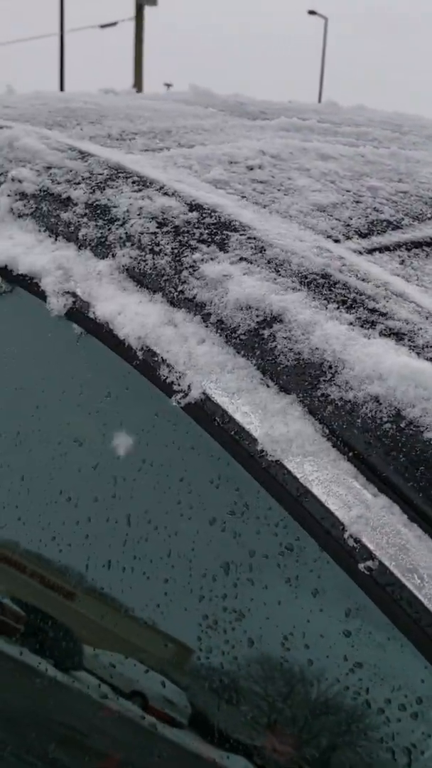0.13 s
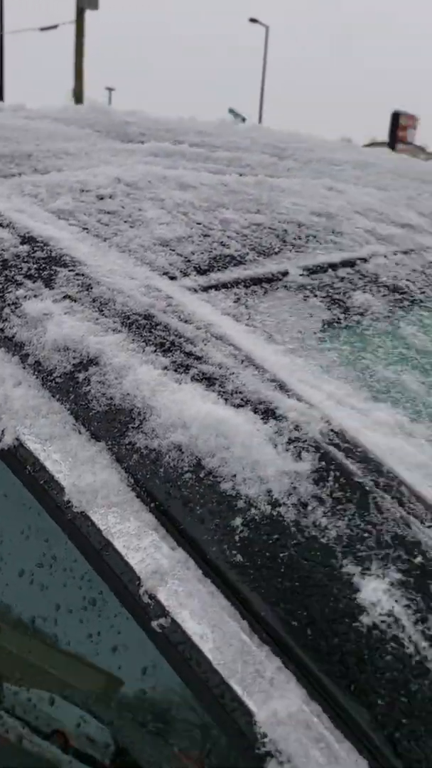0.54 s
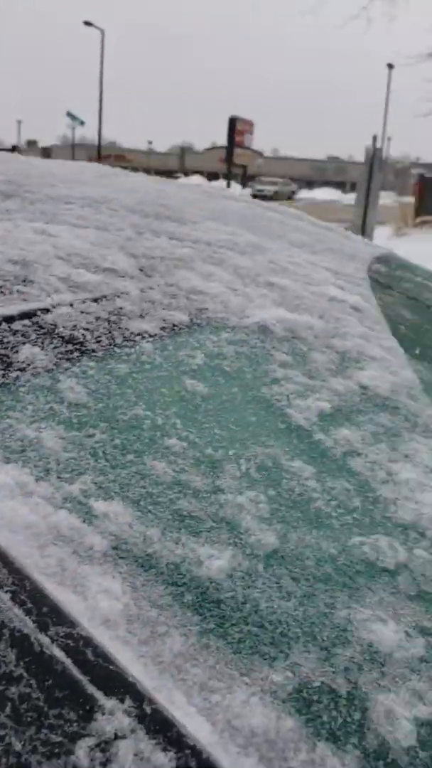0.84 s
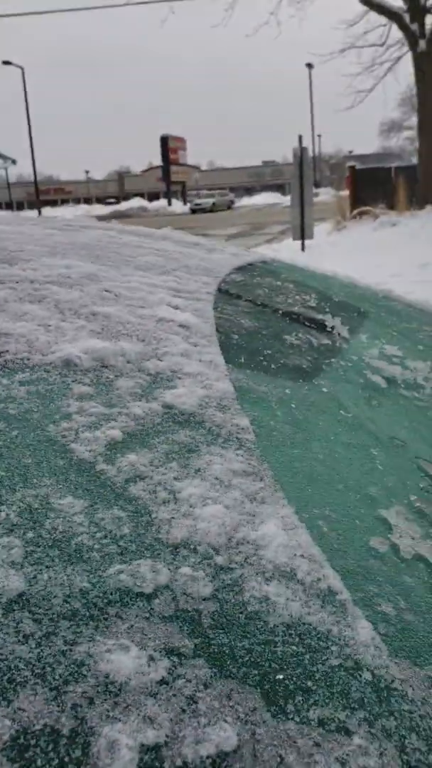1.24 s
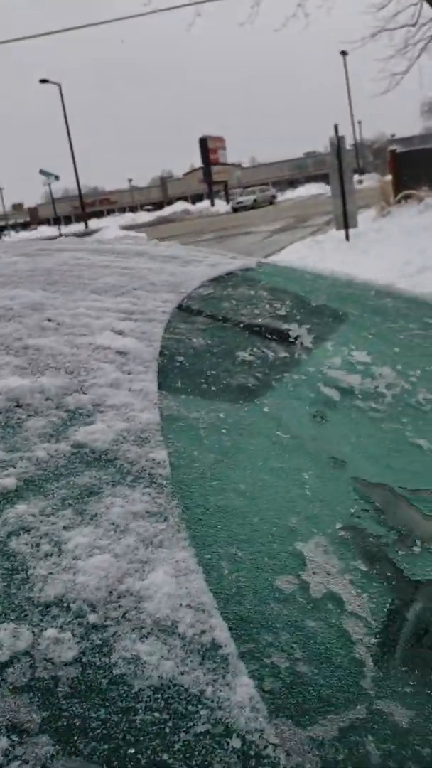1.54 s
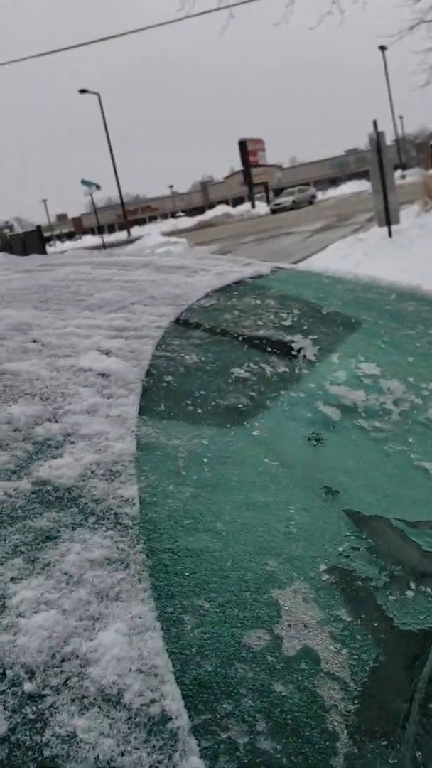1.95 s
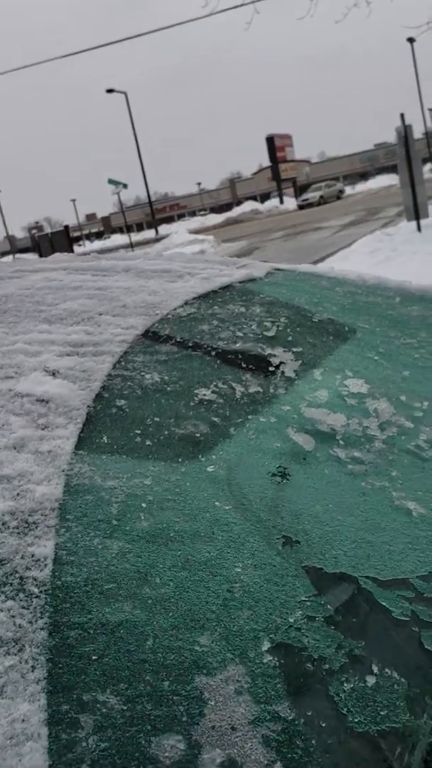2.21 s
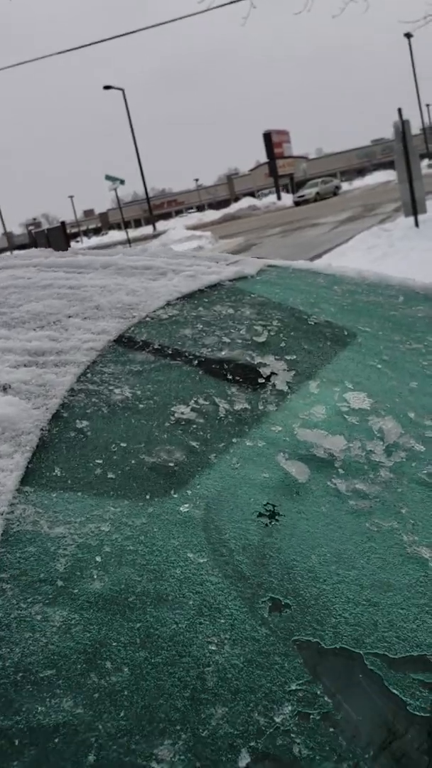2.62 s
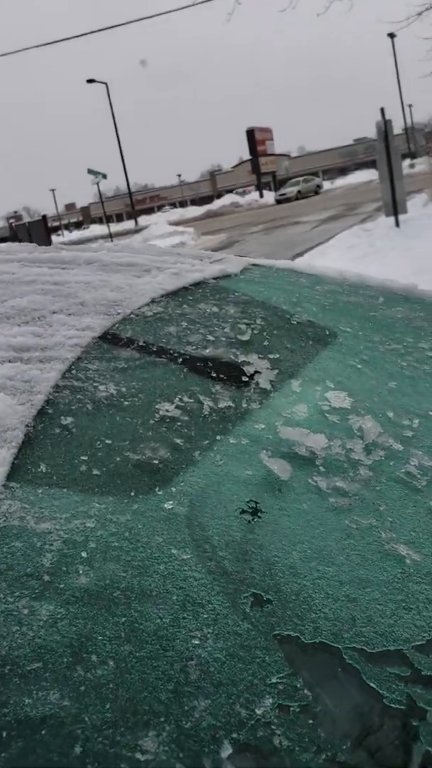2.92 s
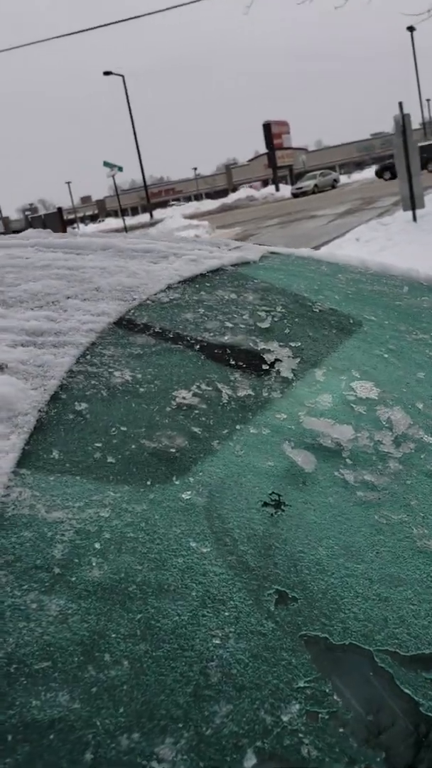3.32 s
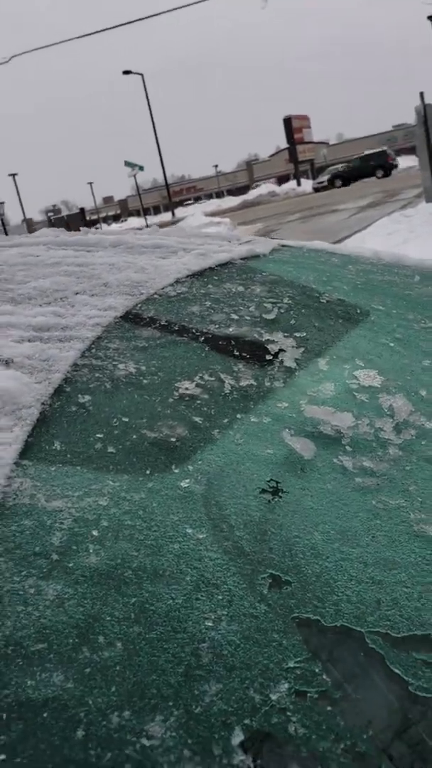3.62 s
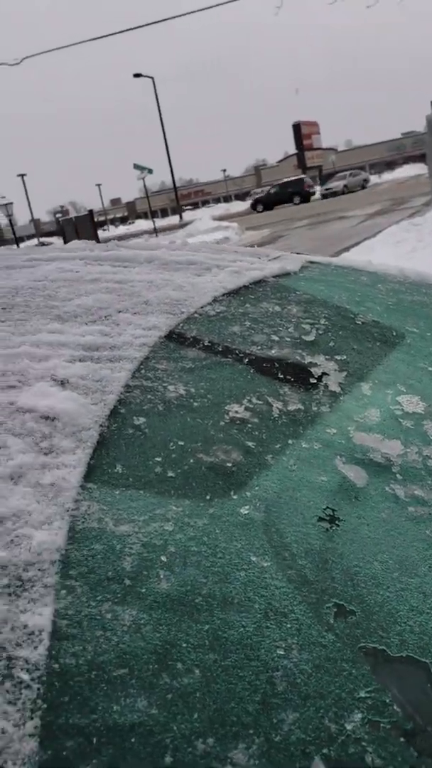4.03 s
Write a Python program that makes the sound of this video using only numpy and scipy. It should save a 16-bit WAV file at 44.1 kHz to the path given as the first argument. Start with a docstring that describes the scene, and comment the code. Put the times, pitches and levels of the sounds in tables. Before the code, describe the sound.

Close, harsh ice scraping on car glass: quick juddering bursts, then a fumbling lull of light clicks, and one last strong stroke.

```python
"""A plastic scraper is pushed over the iced rear window of a car in short rough strokes, close to a phone.
The edge breaks ice in juddering bursts of tiny random cracks that ring the blade and the crushed ice.
Flakes ring at many pitches, and the same slips shake the decaying modes of the pane.
Lone knocks and chips, shaped noise through the blade modes, fall among the strokes; one soft low bump joins.
Under it lies a quiet winter street of slowly swelling noise bands."""
import sys
import numpy as np
from scipy import signal
from scipy.fft import rfft, irfft
from scipy.io import wavfile
from scipy.ndimage import uniform_filter1d

SR = 44100
rng = np.random.default_rng(int(sys.argv[2]) if len(sys.argv) > 2 else 0)


def store_wav(level_fs):
    """Save 16-bit WAV to argv[1]."""
    pcm = np.round(np.clip(np.atleast_2d(level_fs), -1, 1) * 32767)
    wavfile.write(sys.argv[1], SR, pcm.T.astype(np.int16))


N = 183432

# blade resonances: (centre [Hz], width of each of two passes [Hz], relative level [dB])
BLADE_MODES = [(705, 530, -5.5), (980, 580, -9), (1213, 525, -6), (1600, 350, -9.5), (1850, 840, -5),
               (2666, 510, -4.5), (3100, 720, -1.5), (4060, 500, -6.5), (5140, 1130, -4),
               (6050, 2100, -13.5)]


def undb(db):
    """Decibels to amplitude factor."""
    return 10 ** (np.asarray(db) / 20)


def unit(x):
    """Scale to an RMS of 1."""
    return x / np.sqrt(np.mean(x ** 2))


def band(x, hz, width):
    """Resonant band-pass, gain 1 at the centre."""
    return signal.lfilter(*signal.iirpeak(hz, hz / width, fs=SR), x)


def steep_band(x, hz, width):
    """Two equal resonances in series give steeper skirts; RMS 1."""
    return unit(band(band(x, hz, width), hz, width))


def ring(x, hz, t60):
    """One decaying mode; a unit blow rings with size 1."""
    pole = np.exp((2j * np.pi * hz - np.log(1000) / t60) / SR)
    return signal.lfilter([1], [1, -pole], x).imag


def walk(rate):
    """Random levels held 1 / rate s and slewed; spread near 1."""
    hold = int(SR / rate)
    levels = np.repeat(rng.standard_normal(N // hold + 1), hold)
    return 1.2 * uniform_filter1d(levels, hold)[:N]


def pair(like):
    """Weights that turn two unrelated signals into left and right of likeness `like`."""
    like = np.clip(like, 0, 1)
    a, b = np.sqrt(1 + like), np.sqrt(1 - like)
    return np.array([[a, b], [a, -b]]) / np.sqrt(2)


def contact(times, dbs, rise_db_s, fall_db_s):
    """Power of one contact: straight in dB between its moments, steady slopes before and after."""
    t = np.arange(N) / SR
    before = np.maximum(times[0] - t, 0)
    after = np.maximum(t - times[-1], 0)
    db = np.interp(t, times, dbs) - rise_db_s * before - fall_db_s * after
    return undb(2 * db)


def gesture():
    """Blade level and five tone colours; contact powers add, and the strongest sets the colour."""
    # Colours are relative levels before the mix trims:
    # lower blade modes, upper blade modes, fine crush, lower pane modes, upper pane modes.
    # firm strokes that land, rise or sag through a middle level, and lift:
    # (landing [s], level [dB], middle [s], level [dB], lift [s], level [dB], then the five colours [dB])
    strokes = [(0.174, -20.5, 0.24, -23.5, 0.27, -29.5, -6.5, 0, -6, -3, -8),
               (0.565, -23.5, 0.612, -21, 0.6805, -31, -3.5, 3.5, -3, -6, -9),
               (1.227, -39, 1.324, -23, 1.358, -22.5, -1.5, 4.5, -3.5, -4.5, -7),
               (1.365, -28, 1.425, -29.5, 1.478, -35, 2.5, -1, -3, -1, -2.5),
               (1.544, -31.5, 1.595, -22.5, 1.69, -30.5, 4, 1.5, -4, -11, -13),
               (1.864, -33, 1.91, -23, 2.04, -22.5, 1, 0.5, -5, -9, 1),
               (2.05, -23, 2.11, -20.5, 2.14, -27, -3.5, 1.5, -3, -5.5, -5.5),
               (2.288, -41.5, 2.327, -23, 2.507, -28, 0.5, 0.5, -1.5, -11.5, -11),
               (2.62, -28.5, 2.64, -29.5, 2.66, -42, 4, 1.5, -4, 8.5, -4.5),
               (3.989, -25, 3.99, -22.5, 4.167, -19.5, -1, 0, -7, -6, -2.5)]
    # light scuffs, the edge set down or dragged back:
    # (from [s], to [s], level [dB], then the first three colours [dB])
    scuffs = [(0, 0.022, -44.5, 8.5, -3.5, -17), (0.158, .16, -50, 8, -12, -18),
              (0.33, 0.361, -42, 0, 0.5, -6), (0.549, 0.56, -34.5, -1.5, 3.5, -6),
              (0.708, 0.726, -35, -2, -1.5, -3.5), (0.845, 0.942, -48, 0, -0.5, 1.5),
              (1.102, 1.14, -58.5, 0, 0, 5), (1.176, 1.2, -50.5, 4, 3.5, -3), (1.519, 1.545, -42, 4, 1, -3),
              (1.677, 1.694, -38, -7, -20, -19), (1.755, 1.796, -46.5, -2, -9, -10),
              (2.138, 2.178, -34.5, -8, 1, -4), (2.68, 2.717, -47, 6.5, 0, -1),
              (2.839, 2.855, -42, 10, 3, -3.5), (2.921, 2.963, -40, 3, 5, -2),
              (3.067, 3.113, -40.5, 1.5, -2, -5.5), (3.13, 3.173, -43.5, 1.5, -2.5, -3),
              (3.216, 3.272, -33.5, -4, 7.5, -0.5), (3.314, 3.352, -37.5, -7, -10, 0),
              (3.362, 3.385, -37, 10, 4, -3), (3.428, 3.426, -34.5, -3, -2, -4.5),
              (3.475, 3.567, -44.5, 0.5, -6, -2), (3.6, 3.608, -44, -1, -5, -3.5),
              (3.648, 3.724, -55.5, 9.5, -2.5, 6), (3.761, 3.846, -41, 2.5, 4, 2),
              (3.902, 3.904, -43, 10, 3, 2.5), (3.967, 3.983, -41, 8, 2, -4)]
    # the edge lying on the ice: (level [dB], then the five colours [dB])
    rest = (-63.5, 6, -3, -3.5, 10.5, 3)
    land_db_s, lift_db_s = 1390, 1016
    skitter_db, skitter_fall_db_s = -22.5, 160.  # loose ice slides on after each lift, re the lift level
    scuff_rise_db_s, scuff_fall_db_s = 413, 373
    scuff_pane_db = [-3.5, -3]  # lower and upper pane colours of every scuff

    touches = []
    for land, land_db, middle, middle_db, lift, lift_db, *tint in strokes:
        stroke = contact([land, middle, lift], [land_db, middle_db, lift_db], land_db_s, lift_db_s)
        skitter = contact([lift], [lift_db + skitter_db], land_db_s, skitter_fall_db_s)
        touches.append((stroke + skitter, tint))
    for start, end, db, *tint in scuffs:
        scuff = contact([start, end], [db, db], scuff_rise_db_s, scuff_fall_db_s)
        touches.append((scuff, tint + scuff_pane_db))

    power = undb(2 * rest[0]) * np.ones(N)
    colour = np.array(rest[1:])[:, None] * undb(2 * rest[0])
    for touch, tint in touches:
        power = power + touch
        colour = colour + touch * np.array(tint)[:, None]
    return 10 * np.log10(power), colour / power


def leaning(follow_db):
    """Push on the lower pane modes: what follows the blade plus the leans of the hand."""
    # the hand leans on the glass and the lower modes swell: (time [s], level before the pane trim [dB])
    hand_leans = [(.06, -43.5), (.185, -27), (.25, -26), (.575, -27), (0.679, -24.5), (.86, -38),
                  (1.16, -38), (1.35, -20), (1.43, -24.5), (1.6, -33.5), (1.68, -31.5), (1.94, -14),
                  (2.13, -24.5), (2.43, -28), (2.53, -33.5), (2.638, -28), (2.76, -35), (2.94, -30.5),
                  (3.18, -36.5), (3.27, -54), (3.345, -34.5), (3.375, -29.5), (3.49, -30.5), (3.612, -31),
                  (3.77, -41), (3.85, -30), (4.0, -32.5), (4.065, -22)]
    leans = sum(contact([s], [db], rise_db_s=286, fall_db_s=255) for s, db in hand_leans)
    return 10 * np.log10(undb(2 * follow_db) + leans)


def judder(firm, per_s, spread_db, rise_s, tail_s):
    """The edge sticks and lets go unevenly; the firmer the contact, the more steady rubbing fills the gaps."""
    slips = (rng.random(N) < per_s / SR) * undb(spread_db * rng.standard_normal(N))
    onsets = uniform_filter1d(slips, int(rise_s * SR))
    bursts = signal.lfilter([1], [1, -np.exp(-1 / (tail_s * SR))], onsets)
    return slips, (firm + unit(bursts)) / (firm + 1)


def grit(per_s, spread_db):
    """Two trains of tiny cracks of random sign, a few larger than the rest."""
    hit = rng.random((2, N)) < per_s / SR
    signed = hit * rng.standard_normal((2, N))
    return unit(signed * undb(spread_db * rng.exponential(size=(2, N))))


def body(force, modes, patchy_db, like, tilt_db=lambda hz: 0):
    """Steep resonances whose strength wanders as the grip and the ice change."""
    out = 0
    for k, (hz, width, db) in enumerate(modes):
        rung = steep_band(force, hz, width)
        level_db = db + patchy_db * walk(40) + tilt_db(hz)
        out = out + (-1) ** k * undb(level_db) * rung  # neighbours have opposite signs
    return pair(like) @ out


def chips(per_s, t60, low_hz, high_hz, count):
    """Flakes of ice of many sizes break free, each ringing briefly at its own pitch and place."""
    out = 0
    for hz in np.geomspace(low_hz, high_hz, count):
        blows = (rng.random(N) < per_s / count / SR) * undb(2.5 * rng.standard_normal(N))
        placed = blows * (pair(0.49) @ rng.standard_normal((2, N)))
        out = out + ring(placed, hz, t60)
    return unit(out)


def pane(force, upper_db, upper_hz=220.):
    """The low modes of the glass and its frame; below the first mode the pane hardly radiates."""
    # (pitch [Hz], relative drive [dB], time to fall by 60 dB [s])
    glass_modes = [(111.7, -7.5, 0.079), (123.4, -1, 0.17), (156.9, -3, 0.12), (194, -2, 0.056),
                   (258.7, -3.5, 0.059), (306, -4, 0.073), (402, -0.5, 0.024), (520, -17, 0.033)]
    rung = 0
    for hz, db, t60 in glass_modes:
        rung = rung + ring(force * undb(db + upper_db * (hz > upper_hz)), hz, t60)
    return signal.sosfilt(signal.butter(8, 90., "high", fs=SR, output="sos"), rung)


def scraping():
    """Grit in bursts through blade and crushed ice, ringing flakes on top; the same slips push the pane."""
    # crushed-ice bands: (centre [Hz], width of each of two passes [Hz], relative level [dB])
    crush_bands = [(7890, 4000, -1), (9960, 1900, -7), (11880, 2700, 1.5), (13100, 2700, -5),
                   (14300, 3600, 0.5)]
    blade_db, (lower_db, bright_db, crush_db, low_pane_db, upper_pane_db) = gesture()
    push_db = leaning(blade_db + low_pane_db)
    upper_db = blade_db + upper_pane_db - push_db  # upper pane modes do not follow the leans
    firm = np.interp(blade_db, [-45, -25], [.3, 1.3])
    slips, bursts = judder(firm, per_s=120., spread_db=1.5, rise_s=0.00071, tail_s=0.0074)

    def blade_tilt(hz):
        return lower_db * (hz < 1800) + bright_db * (hz > 3600)

    blade = body(bursts * grit(9000., 1.5), BLADE_MODES, patchy_db=3.28, like=0.66, tilt_db=blade_tilt)
    crush = body(bursts * grit(13000., 1.6), crush_bands, patchy_db=2., like=0.15)
    flakes = chips(per_s=700., t60=0.025, low_hz=1400.0, high_hz=5625.0, count=30)
    edge = undb(-5.5) * blade + undb(-5.0) * flakes + undb(crush_db - 2.0) * crush

    # the pane is pushed by the stroke and rings on after it
    push = 0.57 * unit(slips) * rng.standard_normal(N) + rng.standard_normal((2, N))
    glass = pair(0.96) @ pane(push * undb(push_db - 31.5), upper_db + 4.0)
    return undb(blade_db) * edge + glass


def street():
    """Distant traffic and air: half-octave bands that swell together and flicker alone."""
    # spectrum before the overall level is set: (frequency [Hz], relative level per Hz [dB])
    spectrum = [(18, -9), (45, 2.5), (80, -31), (150, 0.5), (450, -14), (1000, -8), (1600, -28),
                (2300, -21), (7500, -43), (12500, -21.5), (16000, -26)]
    curve_hz, curve_db = np.array(spectrum).T
    out, swell = 0, walk(1.0)
    for hz in 32 * 2 ** np.arange(0, 9.1, .5):
        # 10 log10(hz) because the bands widen with pitch
        db = np.interp(np.log(hz), np.log(curve_hz), curve_db) + 10 * np.log10(hz)
        noise = steep_band(rng.standard_normal((2, N)), hz, hz / 2)
        level_db = db + 1.7 * swell + 4.3 * walk(6.96)
        likeness = 1 / (1 + hz / 500.0)  # the low bands are almost mono
        out = out + undb(level_db) * (pair(likeness) @ noise)
    return unit(out) * undb(-49)


def cracks(rise_s=0.00078, tail_s=0.0029, push_s=0.0015, thud_db=-26.5, spread=0.31):
    """Each crack rings the blade modes near its own pitch, sprays fine crush and thuds softly in the pane."""
    # lone cracks and knocks: (time [s], level before the common trim [dB], centre [Hz],
    # fine crush re the knock [dB])
    crack_events = [(0.0425, -8.5, 2260, -42), (0.1264, -29, 2500, -16), (0.176, -5.5, 3940, -11),
                    (0.3406, -9.5, 2370, -8.5), (0.361, -19.5, 2390, -15), (0.5285, -23, 3730, -18),
                    (0.5666, -3.5, 5330, -19), (0.617, 0, 1400, -21), (0.715, -14, 3190, -16),
                    (0.8106, -25, 1900, -3), (0.853, -25, 1750, -18), (1.074, -28, 1730, 1),
                    (1.1646, -34, 1980, -20), (1.216, -19, 2550, -10), (1.263, -24, 4060, -19),
                    (1.286, -11, 3800, -0.5), (1.5426, -14.5, 3100, -2), (1.6706, -5, 3200, -25),
                    (1.742, -27.5, 1940, -3), (1.8562, -26, 4110, -1), (1.947, -3, 3100, 4.5),
                    (2.0193, 0.5, 3700, -19), (2.0882, -10, 3020, 5.5), (2.273, -24.5, 2970, -4),
                    (2.326, -25, 2780, -10), (2.4579, -2, 2860, -19), (2.746, -17, 1050, -7.5),
                    (2.8004, -26, 1320, -22), (2.8198, -21, 2980, -20), (2.8521, -17, 3010, -5),
                    (2.9166, -25, 5110, -19), (2.943, -17.5, 1050, -1), (3.009, -22.5, 1030, -28),
                    (3.056, -20, 1050, -19), (3.0884, -11.5, 1070, -9), (3.1543, -16.5, 1750, -17),
                    (3.2, -22, 2740, 8), (3.313, -12, 2610, -17), (3.3301, -10, 2500, -1.5),
                    (3.3534, -14, 1640, -4), (3.3736, -10, 1650, -0.5), (3.386, -14.5, 1700, -12),
                    (3.42, -18.5, 2730, 1.5), (3.4746, -21, 2900, -6), (3.6068, -17, 2540, -6),
                    (3.899, -26, 1600, -8), (3.9896, 0, 2980, -4), (4.06, 4.5, 2760, -9)]
    length = 2048  # samples
    out, thuds = np.zeros((2, N + length)), np.zeros(N)
    t = np.arange(length) / SR
    shape = (1 - np.exp(-t / rise_s)) * np.exp(-t / tail_s)
    noise = rng.standard_normal((len(crack_events), 2, 2, length))
    for (s, peak_db, hz, crush_db), (low, high) in zip(crack_events, noise):
        i = int(s * SR)
        knock = 0
        for mode_hz, width, _ in BLADE_MODES:
            nearness = np.exp(-(np.log(mode_hz / hz) / spread) ** 2)
            knock = knock + nearness * steep_band(low, mode_hz, width)
        spray = steep_band(high, 11000., 9000.) * undb(crush_db)
        out[:, i:i + length] += undb(peak_db - 8.5) * shape * (pair(0.49) @ (unit(knock) + spray))
        thuds[i] += undb(peak_db + thud_db)
    return out[:, :N] + pane(uniform_filter1d(thuds, int(push_s * SR)), 4.0)


def bump():
    """A few soft low swings under a bell-shaped envelope as the hand shifts."""
    # (centre time [s], pitch [Hz], peak level [dB], time from centre to 1/e [s])
    hand_bump = (.497, 64, -31, .028)
    s, hz, db, length = hand_bump
    t = np.arange(N) / SR - s
    return undb(db) * np.exp(-(t / length) ** 2) * np.cos(2 * np.pi * hz * t)


def scene():
    """The window lies a little to the right: its sound reaches the left port later."""
    port_lag_s = 3e-5
    car = scraping() + cracks()
    lag = np.exp(-2j * np.pi * np.arange(N // 2 + 1) * SR / N * port_lag_s)
    car[0] = irfft(rfft(car[0]) * lag, N)
    return car + bump() + street()


def record(dry):
    """The phone cuts the top steeply."""
    top_hz = 15900
    return signal.sosfilt(signal.ellip(10, .2, 70, top_hz, fs=SR, output="sos"), dry)


dry = scene()
out = record(dry)
store_wav(out)
```